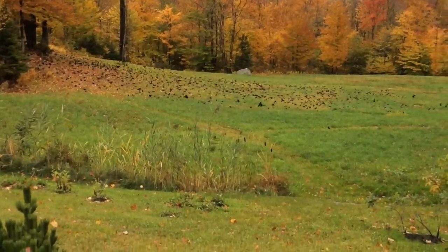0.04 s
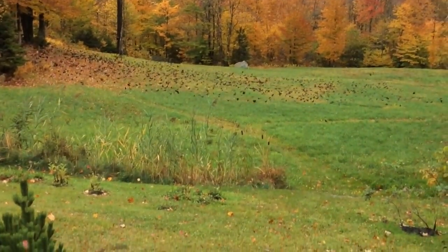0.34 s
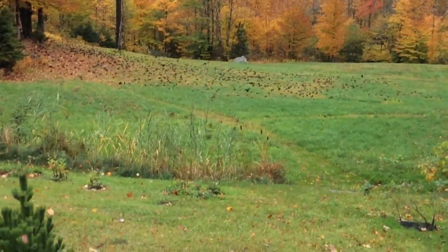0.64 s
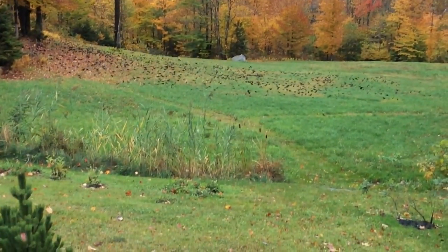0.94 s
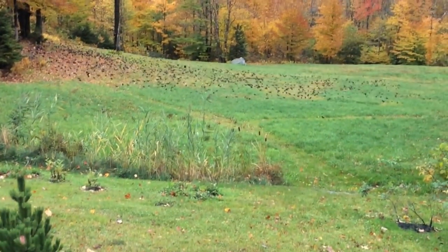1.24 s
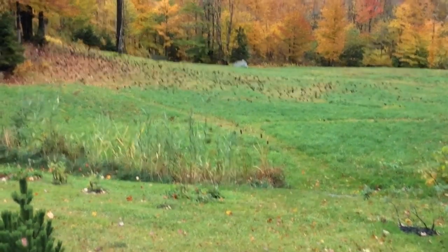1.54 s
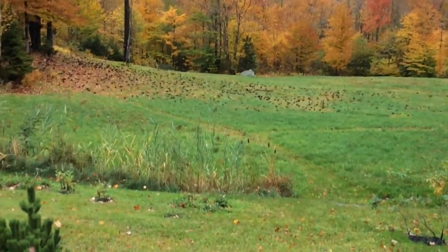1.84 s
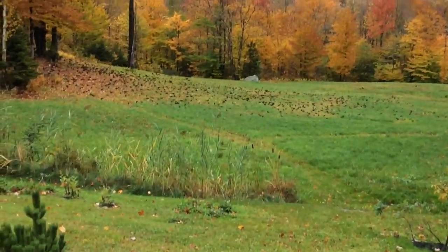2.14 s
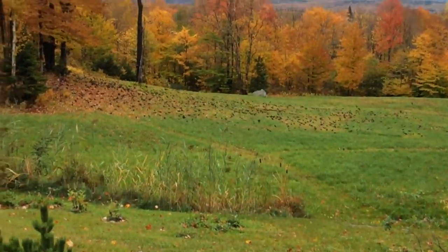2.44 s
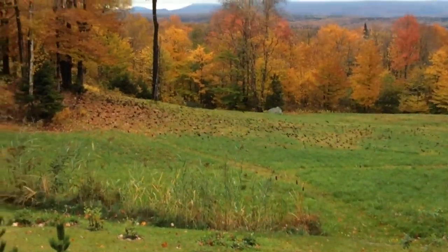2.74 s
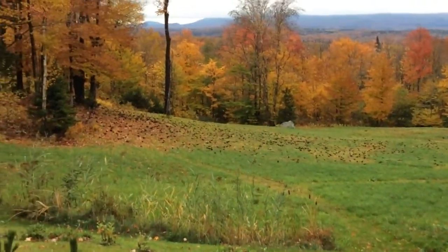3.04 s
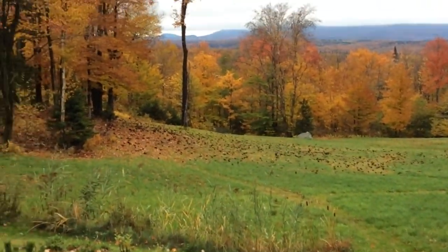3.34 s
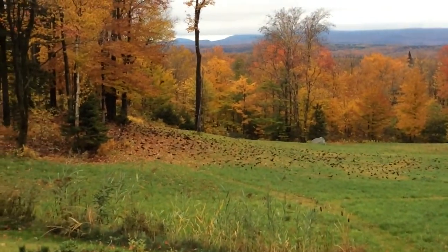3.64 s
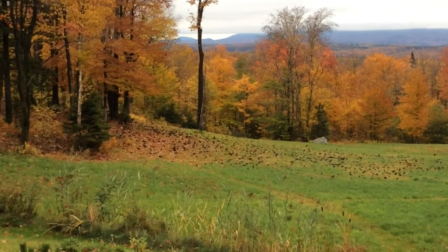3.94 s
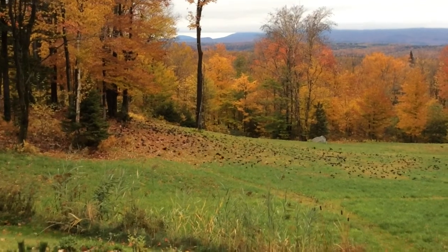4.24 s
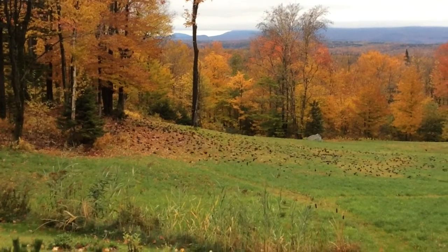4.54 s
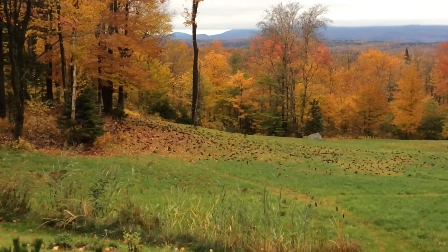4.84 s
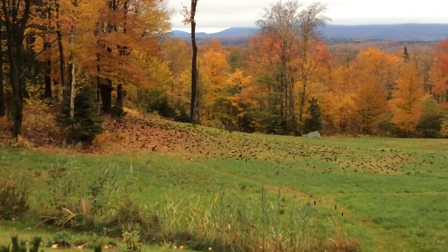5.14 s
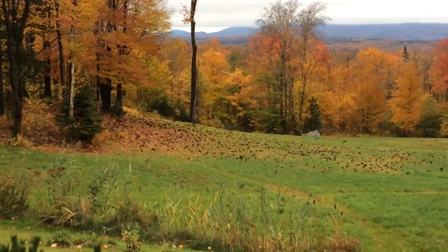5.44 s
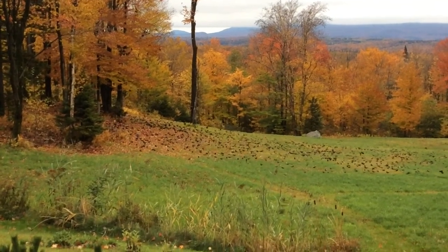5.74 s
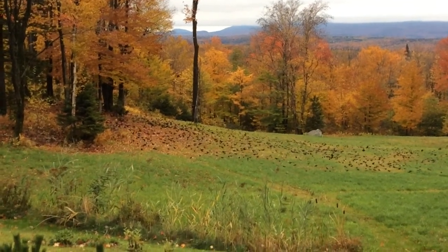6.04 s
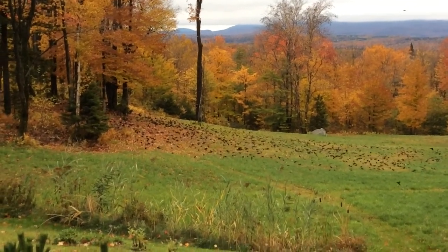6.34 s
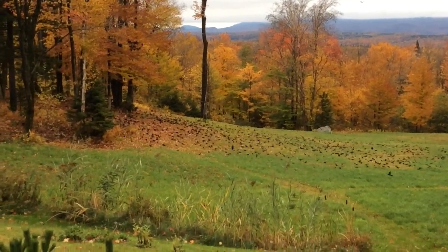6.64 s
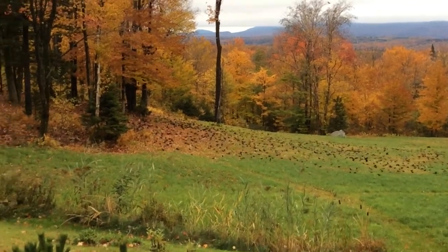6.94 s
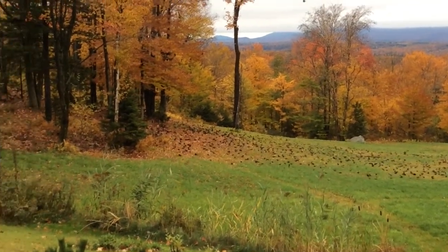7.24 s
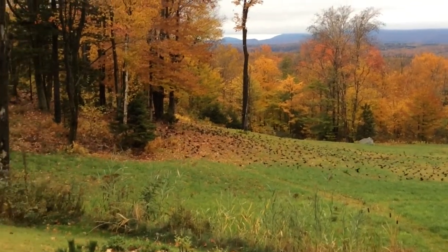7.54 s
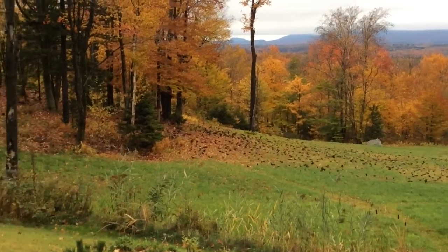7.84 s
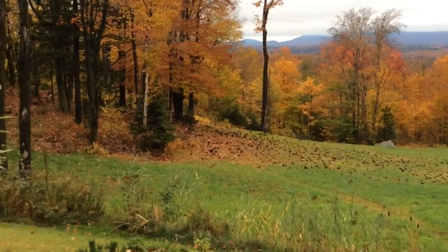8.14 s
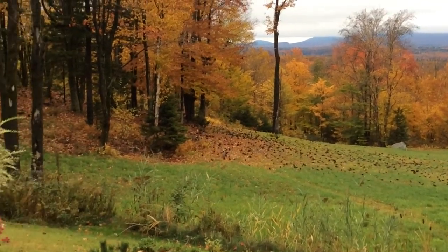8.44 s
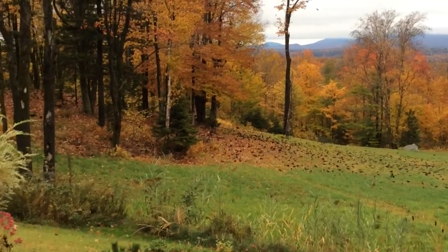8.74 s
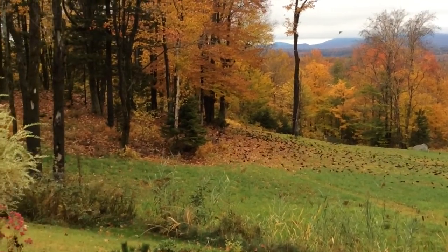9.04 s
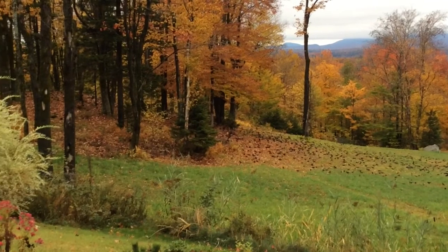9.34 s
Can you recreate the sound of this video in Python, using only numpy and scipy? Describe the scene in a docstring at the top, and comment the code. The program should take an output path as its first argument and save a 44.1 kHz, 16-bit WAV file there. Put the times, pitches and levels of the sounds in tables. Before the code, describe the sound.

Dense distant bird chatter of squeaks, whistles and dry chucks, with low wind buffeting on the microphone growing stronger toward the end.

```python
"""A field at the forest edge, with a big flock of grackles chattering some way off.
Each bird's syrinx vibrates regularly for rusty squeaks and thin whistles, chaotically for dry chucks.
Hundreds of calls merge into a wash, and the trees throw the calls back as reverberation.
Gusts of wind come more and more often: their eddies and vortices thump on the microphone."""
import sys
import numpy as np
from scipy import signal
from scipy.fft import rfft, irfft, next_fast_len
from scipy.io import wavfile
from scipy.ndimage import uniform_filter1d, map_coordinates

SR = 44100
rng = np.random.default_rng(int(sys.argv[2]) if len(sys.argv) > 2 else 0)


def digitize_waveform(pressure):
    """Quantize a signal to 16-bit integers and store it at the path in sys.argv[1].

    Rows of a 2-D input are taken as channels; values are limited to [-1, 1].
    """
    field = np.atleast_2d(pressure).T
    bounded = np.clip(field, -1, 1)
    quanta = np.round(bounded * 32767).astype(np.int16)
    wavfile.write(sys.argv[1], SR, quanta)


N = 413650


def amp(db):
    """The decibel scale: 20 dB is a factor of ten in amplitude."""
    return 10 ** (np.asarray(db) / 20)


def unit(x):
    """Normalisation to rms 1."""
    return x / np.sqrt(np.mean(x ** 2) + 1e-20)


def along(points, hz):
    """Interpolation of (f/Hz, value) points on a logarithmic frequency axis."""
    f, v = np.transpose(points)
    return np.interp(np.log(hz + 1), np.log(f + 1), v)


def curves(rows):
    """Linear interpolation in time: one value per sample for each column after t/s."""
    s, *cols = np.transpose(rows)
    return [np.interp(np.arange(N) / SR, s, c) for c in cols]


def swells(rows, rise_db_per_s, fall_db_per_s):
    """Exponential rise and decay around each (t/s, hold/s, level/dB); the highest prevails, in dB."""
    t = np.arange(N) / SR
    level_db = np.full(N, -120.)
    for s, hold, db in rows:
        before, after = np.maximum(s - t, 0), np.maximum(t - s - hold, 0)
        level_db = np.maximum(level_db, db - rise_db_per_s * before - fall_db_per_s * after)
    return level_db


def wobble(rate, size=N):
    """Random modulation: a spline through Gaussian knots, rate of them a second."""
    knots = rng.standard_normal(int(size * rate / SR) + 4)
    return map_coordinates(knots, [np.arange(size) * rate / SR], mode="nearest")


def filtered(x, response):
    """Linear filtering: the spectrum of x times a frequency response."""
    m = next_fast_len(len(x) + 2048)
    return irfft(rfft(x, m) * response(np.fft.rfftfreq(m, 1 / SR)), m)[:len(x)]


def noise(spectrum, size=N):
    """Spectral shaping: white noise coloured by (f/Hz, level/dB) points, at rms 1."""
    return unit(filtered(rng.standard_normal(size), lambda hz: amp(along(spectrum, hz))))


def add(track, s, sound):
    """Superposition: a sound joins the track at s seconds."""
    start = int(np.clip(s * SR, 0, N))
    track[start:start + len(sound)] += sound[:N - start]


def air():
    """Ambient noise: the steady quiet of the field."""
    # spectral density: f/Hz, relative level/dB
    spectrum = [(20, -8), (50, -5), (100, 0), (250, -2.5), (600, -2), (1000, -8), (2000, -17.5),
                (6000, -25.5)]
    return amp(-67) * noise(spectrum)


def rumble(breeze_db):
    """Turbulence: the breeze makes slow pressure fluctuations on the microphone."""
    # spectral density: f/Hz, relative level/dB
    spectrum = [(15, -40), (35, -5), (65, 1.5), (100, -3.5), (180, -15.5), (350, -41), (900, -80)]
    return amp(breeze_db + 0.5 + 2.3 * wobble(22)) * noise(spectrum)


def eddies(breeze_db, gust_db):
    """Frozen turbulence: faster air sweeps the same eddies past sooner, so they sound higher."""
    # spectral density at a relative speed of 1: f/Hz, relative level/dB
    spectrum = [(15, -38), (30, -25), (45, -7), (65, 1), (120, 0), (200, -11), (300, -19.5), (420, -37.5),
                (600, -45.5), (1200, -97)]
    flurry_db = 4 * wobble(70)
    speed = amp(.09 * (breeze_db + 54) + .13 * (np.maximum(gust_db, -47) + flurry_db + 36))
    pattern = noise(spectrum, size=2 * N)
    pressure = amp(flurry_db) * map_coordinates(pattern, [np.cumsum(speed)], order=3, mode="wrap")
    local_power = uniform_filter1d(uniform_filter1d(pressure ** 2, size=1500), size=1000)
    return pressure / np.sqrt(np.abs(local_power) + 1e-9)


def vortex(t, hz):
    """The pressure pulse of a passing vortex: a brief swing between push and suction."""
    phase = 2 * np.pi * hz * t
    return np.cos(phase + rng.uniform(0, 2 * np.pi)) / np.cosh(np.clip(phase / 1.45, -50, 50))


def wind():
    """Flow noise: gusts drive eddies and vortices against the microphone, over the breeze's rumble."""
    # the breeze building up between gusts: t/s, relative level/dB
    breeze = [(0, -75), (3.2, -72.5), (5.7, -72.5), (6.1, -54), (6.75, -63), (7.3, -46), (7.8, -62),
              (8.05, -61), (8.4, -54), (8.85, -44.5), (9.38, -48)]
    # gusts: t/s, hold/s, relative level/dB
    gusts = [(.85, .02, -57), (.94, 0.053, -48), (1.04, 0.035, -59), (3.155, 0.04, -41),
             (3.525, 0.007, -47.5), (3.915, .06, -46), (4.04, 0.005, -41.5), (4.23, 0.062, -41.5),
             (4.6, .02, -57), (4.905, 0.0067, -36), (4.965, 0.014, -42.5), (5.16, 0.042, -40.5),
             (5.39, 0.02, -47), (5.59, 0.014, -37), (5.67, 0.023, -46), (5.87, 0.045, -37.5),
             (6.0, 0.092, -34), (6.12, 0.053, -40.5), (6.255, 0.018, -48), (6.43, 0.062, -41.5),
             (6.5, 0.14, -46.5), (6.855, 0.021, -41), (7.035, 0.027, -39), (7.155, 0.1, -35),
             (7.32, 0.072, -33), (7.42, 0.13, -36.5), (7.62, 0.098, -42.5), (8.09, 0.036, -43.5),
             (8.145, 0.032, -33.5), (8.255, 0.042, -37.5), (8.465, 0.013, -50.5), (8.545, .03, -32),
             (8.64, 0.13, -21), (8.785, 0.049, -25.5), (8.99, 0.02, -26.5), (9.06, 0.028, -32),
             (9.155, .015, -42.5), (9.243, 0.024, -29), (9.323, 0.0091, -20.5), (9.36, .02, -21)]
    # sharp vortices: t/s, envelope peak level/dB, f/Hz
    vortices = [(3.167, -30, 101), (4.243, -30.5, 139), (4.281, -24.5, 128), (4.913, -21, 135),
                (4.973, -30.5, 101), (5.604, -21, 92), (6.007, -20, 242), (6.042, -20.5, 194),
                (6.078, -23.5, 155), (6.158, -29, 129.7), (6.866, -28, 82), (7.152, -26, 175),
                (7.204, -22.5, 179), (7.326, -26, 230), (7.367, -20.5, 176), (7.555, -23.5, 137),
                (8.154, -21, 85), (8.264, -24.5, 149), (8.569, -22, 198), (8.646, -13, 136),
                (8.676, -17, 277), (8.732, -9.5, 330), (8.751, -13.5, 135), (8.812, -14.5, 177),
                (9.005, -22.5, 166), (9.087, -22.5, 154.1), (9.244, -18.5, 208), (9.328, -12.5, 236),
                (9.377, -10, 224)]
    breeze_db, = curves(breeze)
    gust_db = swells(gusts, rise_db_per_s=806, fall_db_per_s=604)
    low_rumble = rumble(breeze_db)
    buffeting = eddies(breeze_db, gust_db)
    thumps, swept = np.zeros(N), np.zeros(N)
    t = np.arange(-SR // 40, SR // 40) / SR
    for s, db, hz in vortices:
        add(thumps, s + t[0], amp(db) * vortex(t, hz))
        add(swept, s + t[0], np.exp(-(t / 0.0081) ** 2))
    dip_db = 5.8 * np.minimum(swept, 1)  # a big vortex sweeps the small eddies aside
    return low_rumble + thumps + amp(gust_db - 1.5 - dip_db) * buffeting


def forest(x):
    """Reverberation: the trees return a diffuse tail whose treble rings longest."""
    # time to decay by 60 dB: f/Hz, T60/s
    decay_times = [(500, 0.36), (3000, 0.62), (5000, 0.72), (10000, 0.86)]
    hz, t, bands = signal.stft(rng.standard_normal(SR // 2), SR, nperseg=256)
    decay = amp(-60 * t / along(decay_times, hz)[:, None])
    tail = signal.istft(bands * decay, SR, nperseg=256)[1]
    return signal.fftconvolve(x, tail / np.linalg.norm(tail))[:N]


def scatter(call, spread_s, scatter_db):
    """Multipath interference: grass and ground return a call by longer paths, which roughens it."""
    t = np.arange(SR // 16) / SR
    echoes = rng.standard_normal(len(t)) * np.exp(-t / spread_s)
    direct = t == 0
    heard = signal.fftconvolve(call, direct + amp(scatter_db) * echoes / np.linalg.norm(echoes))
    return heard * np.linalg.norm(call) / np.linalg.norm(heard)


def patchy(x, depth_db):
    """Amplitude modulation in brief patches, as voices come and go at different pitches."""
    bands = signal.stft(x, nperseg=512)[2]
    patches = uniform_filter1d(rng.standard_normal(bands.shape), size=7, axis=0)  # across frequency
    patches = uniform_filter1d(patches, size=9, axis=1)  # across time
    return unit(signal.istft(bands * amp(depth_db * unit(patches)), nperseg=512)[1][:N])


def wash(chatter_db, shrill_db):
    """Incoherent summation: the farthest voices merge into noise."""
    # spectral density of the chatter: f/Hz, relative level/dB
    chatter_spectrum = [(410, -26), (700, -12.5), (845, -7), (1060, -8), (1290, -4), (1690, -4.5),
                        (2250, -2.5), (3090, -2.5), (4750, -8), (5340, -12.5), (6000, -13), (7800, -38),
                        (13200, -120)]
    # spectral density of the shrill calls: f/Hz, relative level/dB
    shrill_spectrum = [(3500, -33), (5000, -7), (6300, -1.5), (7800, 2), (9000, -6), (11000, -8.5),
                       (13000, -13), (15300, -26)]
    chatter = amp(chatter_db - 3) * patchy(noise(chatter_spectrum), depth_db=1.9)
    hiss = amp(shrill_db - 3) * patchy(noise(shrill_spectrum), depth_db=2.5)
    return chatter + hiss


def note(length):
    """The amplitude envelope of a call: its progress from 0 to 1, and its rounded swell."""
    u = np.linspace(0, 1, max(int(length * SR), 64))
    return u, unit(np.abs(np.sin(np.pi * u ** 0.68)) ** 0.32)


def squeak(length, pitch_hz, glide_hz, rough, overtone_db):
    """Self-sustained oscillation of the syrinx: a gliding whistle, made buzzy by membrane flutter."""
    u, swell = note(length)
    arch = 1 - 0.0056 * np.cos(2 * np.pi * u)  # the pitch bulges in mid-call
    hz = pitch_hz * arch + glide_hz * (u - .5)
    flutter_depth = rough * np.sqrt(np.abs(hz) / 5000)  # high calls flutter more
    flutter = flutter_depth * (wobble(420, len(u)) + wobble(50, len(u)) / 2)
    phase = 2 * np.pi * np.cumsum(hz * (1 + flutter)) / SR
    overtone = amp(overtone_db) * (hz < SR / 4) * np.sin(2 * phase)
    shimmer = amp(2.0 * wobble(124, len(u)) + 1.24 * wobble(28.4, len(u)))
    return unit(swell * shimmer * (np.sin(phase) + overtone))


def chuck(length, centre_hz, octaves):
    """Source and filter: a harsh burst of chaotic syrinx flutter through one broad throat resonance."""
    u, swell = note(length)
    source = swell * amp(1.4 * wobble(247, len(u))) * rng.standard_normal(len(u))
    throat = lambda hz: 1 / (1 + (np.log2((hz + 1) / centre_hz) / octaves) ** 2)
    return unit(filtered(source, throat))


def creak(length, pitch_hz):
    """A harmonic series on a jittering fundamental: a nasal creak."""
    # partials: harmonic number, relative level/dB
    harmonics = [(1, 3.5), (2, 5.5), (3, -6), (4, -2), (5, -16), (6, -10), (7, -26)]
    u, swell = note(length)
    phase = 2 * np.pi * np.cumsum(pitch_hz + 14 * wobble(288, len(u))) / SR
    return unit(swell * sum(amp(db) * np.sin(round(k) * phase) for k, db in harmonics))


def far_squeaks(count, centre_hz, spread):
    """Superposition of many birds squeaking in loose succession, at random pitches and distances."""
    out = np.zeros(N)
    times = (np.arange(count) + rng.uniform(-1, 1, count)) * N / SR / count
    traits = 2 * np.tanh(rng.standard_normal((count, 4)) / 2)
    for s, (pitch, duration, glide, nearness) in zip(times, traits):
        hz = centre_hz * np.exp(spread * pitch)
        length = 0.068 * np.exp(.4 * duration)
        call = squeak(length, hz, 0.0556 * hz * glide, rough=0.01066, overtone_db=-12)
        add(out, s, amp(4.7 * nearness) * call)
    return unit(out)


def far_chucks(count):
    """A random point process: the flock's contact calls fall independently of one another."""
    out = np.zeros(N)
    times = rng.uniform(0, N / SR, count)
    traits = rng.standard_normal((count, 3)).clip(-2, 2)
    for s, (pitch, duration, nearness) in zip(times, traits):
        call = chuck(0.024 * np.exp(0.34 * duration), 2800 * np.exp(.16 * pitch), octaves=0.34)
        add(out, s, amp(3 * nearness) * call)
    return unit(out)


def near_birds():
    """Calls above the masking threshold: the nearer birds stand out singly from the crowd."""
    # squeaks and whistles: t/s, length/s, f/Hz, glide over the call/Hz, relative level/dB
    squeaks = [(0.016, 0.15, 2980, -120, -58.5), (0.026, .19, 8950, -650, -72),
               (.15, 0.065, 3410, 393, -51), (.262, .096, 5130, 60, -64), (0.327, 0.073, 4105, -70, -54),
               (.478, 0.1, 3660, -95, -57.5), (0.516, 0.14, 5700, 220, -60.5), (0.614, .1, 4220, -400, -60),
               (1.061, 0.09, 11000, -2000, -69), (1.068, 0.044, 4470, 0, -57),
               (1.132, 0.054, 3560, 194, -54.5), (1.28, .04, 9950, 300, -71),
               (1.373, 0.034, 11950, 1095, -66), (1.382, 0.036, 6030, 0, -58.5),
               (1.554, 0.06, 9530, 0, -66), (1.611, 0.041, 4750, 2, -50.5), (1.779, 0.043, 4640, 88, -55.5),
               (1.866, .067, 8600, 98, -60.5), (1.98, 0.091, 5090, 150, -58.5),
               (2.121, 0.11, 2990, -57, -57.5), (2.143, .095, 9540, -200, -66.5),
               (2.264, 0.058, 4130, 88, -54.5), (2.471, 0.17, 9460, 340, -65.5),
               (2.575, .057, 4480, -4, -56.5), (2.647, 0.18, 8800, -450, -64.5),
               (3.072, 0.037, 10550, 300, -63), (3.173, .044, 5900, 120, -59.5),
               (3.164, .05, 11700, 400, -73), (3.557, .13, 4680, -320, -57),
               (3.715, 0.036, 7950, -800, -58.5), (3.836, .08, 8600, 80, -65), (3.89, .08, 9400, -500, -67),
               (3.997, 0.18, 4940, 260, -58.5), (4.118, .16, 5330, 380, -65), (4.121, 0.076, 3940, 40, -57),
               (4.797, 0.18, 5740, -200, -57.5), (4.835, 0.056, 4200, -120, -54.5),
               (4.909, 0.12, 9530, 100, -64), (4.948, 0.081, 4780, -190, -58),
               (5.003, .13, 9000, -700, -65), (5.078, 0.038, 3090, -74, -48.5),
               (5.486, 0.059, 7630, 0, -61), (5.89, 0.04, 7260, -130, -60),
               (6.008, 0.079, 4110, -370, -55.5), (6.01, 0.076, 5660, 570, -59),
               (6.194, .1, 6180, 118, -58.5), (6.245, 0.18, 3796, -41, -54.5),
               (6.262, 0.038, 3283, 38, -50.5), (6.403, 0.045, 4800, 103, -55),
               (6.736, 0.056, 4565, -70.5, -52), (6.815, 0.1, 8200, -200, -62.5),
               (7.101, .13, 7880, -38.5, -62), (7.104, .13, 4650, -80, -64),
               (7.44, 0.13, 7370, -300, -63.5), (7.459, 0.045, 3700, 162, -50.5),
               (7.571, 0.056, 4400, 147.5, -58), (7.686, .072, 6070, 450.5, -61.5),
               (7.92, 0.047, 4740, -140, -58), (7.953, 0.11, 8260, 500, -61),
               (7.968, 0.096, 3900, -350, -57.5), (8.217, .084, 5560, 160, -56.5),
               (8.313, 0.033, 5760, -300, -49), (8.354, 0.16, 10280, -150, -66),
               (8.356, 0.042, 5150, -280, -53), (8.638, 0.054, 4820, 150, -54.5),
               (8.674, 0.35, 4125, 41, -63), (8.682, 0.13, 6680, 160, -64.5), (9.019, .05, 5900, 500, -60),
               (9.131, 0.027, 4580, 1, -51), (9.254, 0.047, 3975, 59, -53.5)]
    # harsh chucks and rasps: t/s, length/s, centre f/Hz, relative level/dB
    chucks = [(.0, 0.054, 2600, -52.5), (0.597, 0.032, 2800, -55), (.778, 0.045, 2700, -52),
              (1.119, .043, 2830, -57), (1.47, 0.1, 3340, -54.5), (1.556, .078, 3550, -56),
              (2.008, 0.11, 3000, -52), (2.24, .055, 2600, -55), (2.365, 0.039, 2300, -48),
              (2.647, 0.056, 2700, -54), (4.409, 0.073, 3200, -53), (4.564, 0.075, 3330, -56.5),
              (4.719, 0.08, 2400, -56), (5.785, 0.044, 2420, -48), (6.004, .02, 3000, -49.5),
              (6.137, .13, 2850, -55.5), (6.251, .32, 3670, -59), (6.548, 0.073, 3700, -54),
              (6.706, 0.049, 2880, -53), (7.692, .029, 2800, -54), (7.766, 0.027, 2800, -51.5),
              (8.213, .047, 2900, -53), (9.191, 0.071, 2500, -57.5)]
    # short bright ticks: t/s, length/s, centre f/Hz, relative level/dB
    ticks = [(0.777, 0.018, 9000, -69.5), (1.473, 0.01, 7000, -59), (1.746, 0.011, 12800, -60.5),
             (4.613, 0.055, 7750, -60.5), (6.485, .016, 7600, -61), (6.577, .025, 7900, -64),
             (8.022, 0.071, 9500, -70)]
    # nasal creaks: t/s, length/s, fundamental f/Hz, relative level/dB
    creaks = [(2.818, 0.052, 1316, -65), (5.379, 0.14, 1300, -64), (5.474, 0.11, 1282, -64),
              (6.3, 0.18, 1276, -70), (7.359, 0.1, 1290, -58.5)]
    out = np.zeros(N)
    for s, length, hz, glide_hz, db in squeaks:
        call = squeak(length, hz, glide_hz, rough=.0085, overtone_db=-17.5)
        add(out, s, amp(db - 2.3) * scatter(call, spread_s=0.014, scatter_db=-6.5))
    for s, length, hz, db in chucks:
        add(out, s, amp(db - 3) * chuck(length, hz, octaves=0.29))
    for s, length, hz, db in ticks:
        add(out, s, amp(db + 1.5) * chuck(length, hz, octaves=0.23))
    for s, length, hz, db in creaks:
        add(out, s, amp(db) * creak(length, hz))
    return out


def flock():
    """Direct and reverberant sound of the calls over the wash; far voices follow the flock's excitement."""
    # the flock's excitement: t/s, relative chatter level/dB, relative shrill level/dB
    excitement = [(0, -54.5, -64), (.4, -58, -63), (.55, -54.5, -65), (1.3, -54.5, -63.5), (1.6, -55, -63),
                  (2.3, -54.5, -64), (3.35, -54.5, -64.5), (3.7, -54, -63), (4.25, -55, -64.5),
                  (4.85, -53.5, -60.5), (5.03, -56, -65), (5.73, -56.5, -69.5), (6.15, -55, -63.5),
                  (6.55, -55.5, -64.5), (7.6, -56, -66.5), (8.25, -53.5, -62.5), (8.95, -56, -66.5),
                  (9.38, -55, -62.5)]
    # many birds call at once: t/s, hold/s, rise in level/dB (ignored if negative)
    outbursts = [(.78, 0.044, 4), (.92, 0.1, 3.5), (1.12, 0.068, 2), (1.74, .03, 3), (3.02, 0.084, 3.5),
                 (4.72, 0.1, 1.5), (5.45, 0.17, 2), (5.79, 0.061, 1), (7.33, 0.15, 3.5), (8.0, 0.11, -4),
                 (9.05, 0.16, 2.5)]
    outburst_db = np.maximum(swells(outbursts, rise_db_per_s=500, fall_db_per_s=250), 0)
    chatter_db, shrill_db = curves(excitement) + outburst_db
    squeaks = amp(-8) * far_squeaks(count=300, centre_hz=3200, spread=.21)
    gurgles = amp(-19) * far_squeaks(count=70, centre_hz=1550, spread=.22)
    whistles = amp(-7.3) * far_squeaks(count=170, centre_hz=7300, spread=.2)
    crowd = squeaks + gurgles + amp(-7.5) * far_chucks(count=300)
    calls = near_birds() + amp(chatter_db) * crowd + amp(shrill_db) * whistles
    return wash(chatter_db, shrill_db) + amp(-0.5) * calls + amp(-5) * forest(calls)


def scene():
    """Superposition of birds, wind and the quiet air of the field, in one channel."""
    return (flock() + wind() + air())[None]


def record(dry):
    """Band limiting removes the deepest rumble and highest treble; a brief fade ends without a click."""
    low_hz, top_hz, fade_s = 32, 15283, .003
    highpass = signal.butter(2, low_hz, "highpass", fs=SR, output="sos")
    lowpass = signal.ellip(12, .1, 80, top_hz, fs=SR, output="sos")
    fade = np.minimum(np.arange(N)[::-1] / (fade_s * SR), 1)
    return signal.sosfilt(lowpass, fade * signal.sosfilt(highpass, dry))


dry = scene()
out = record(dry)
digitize_waveform(out)
```